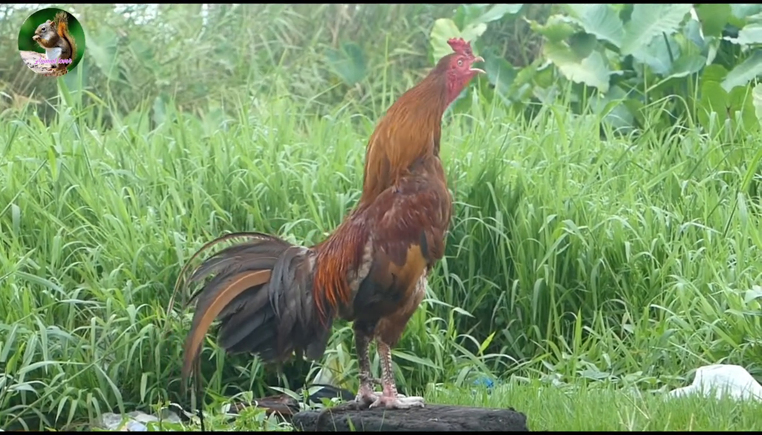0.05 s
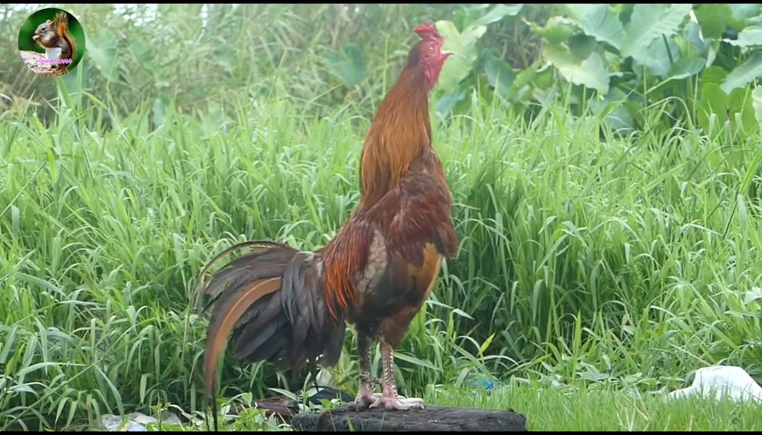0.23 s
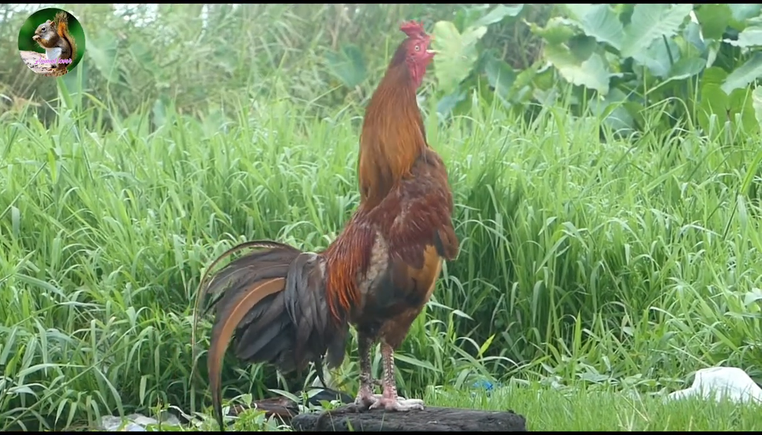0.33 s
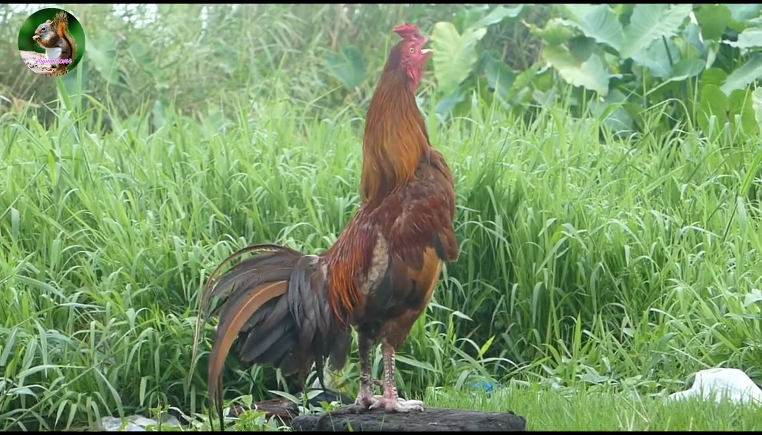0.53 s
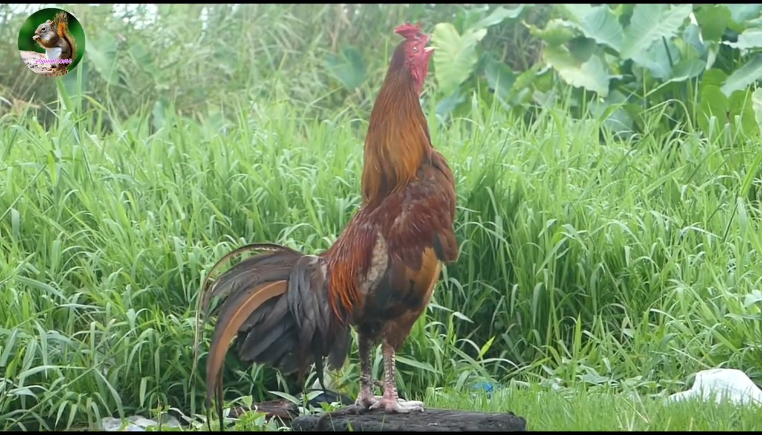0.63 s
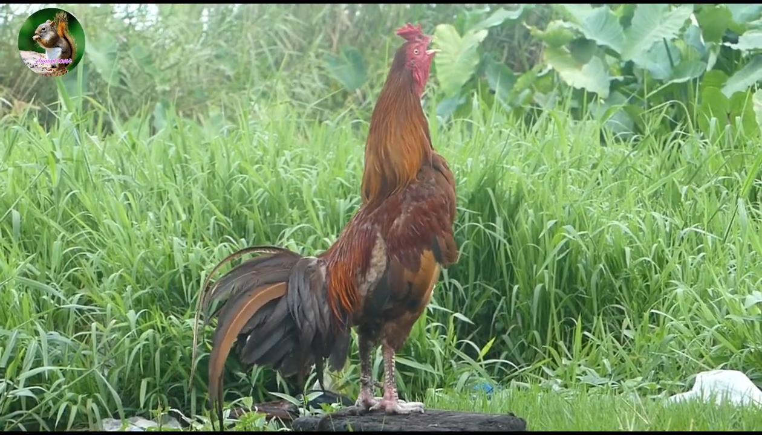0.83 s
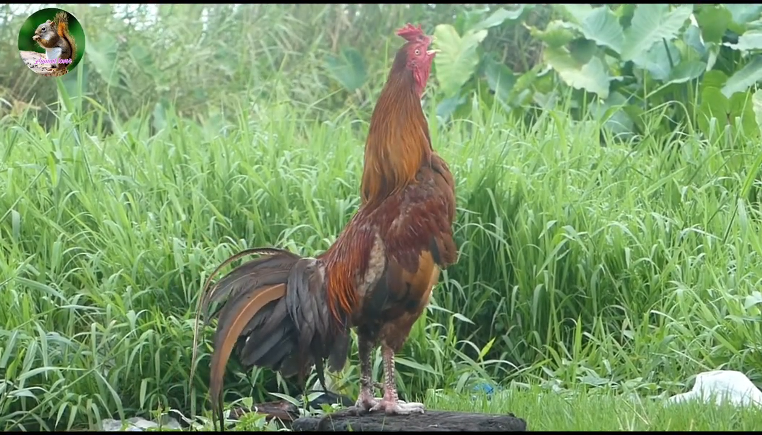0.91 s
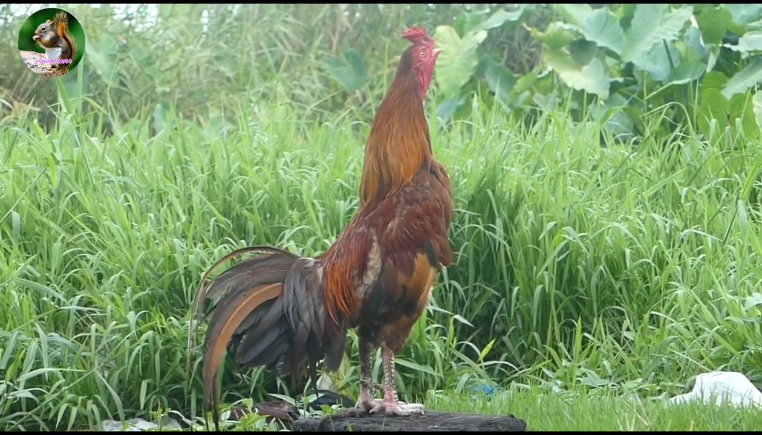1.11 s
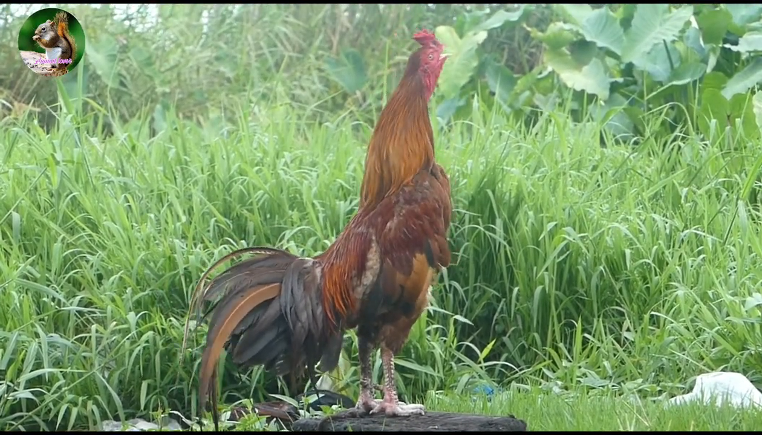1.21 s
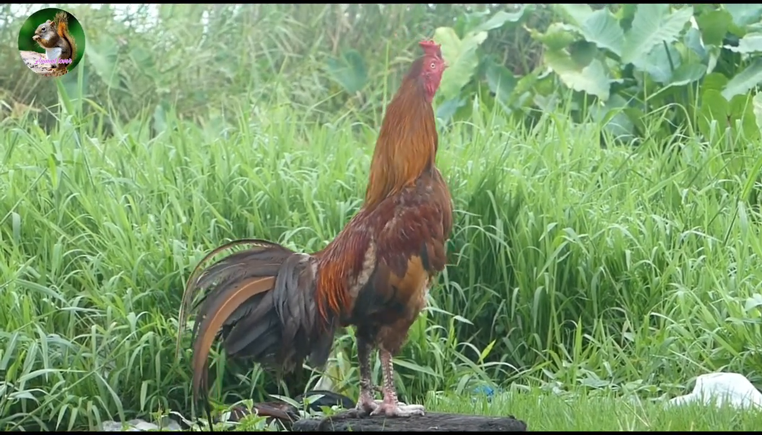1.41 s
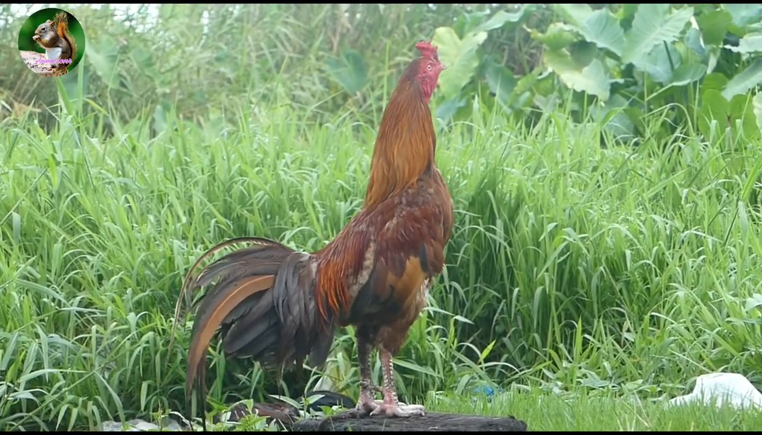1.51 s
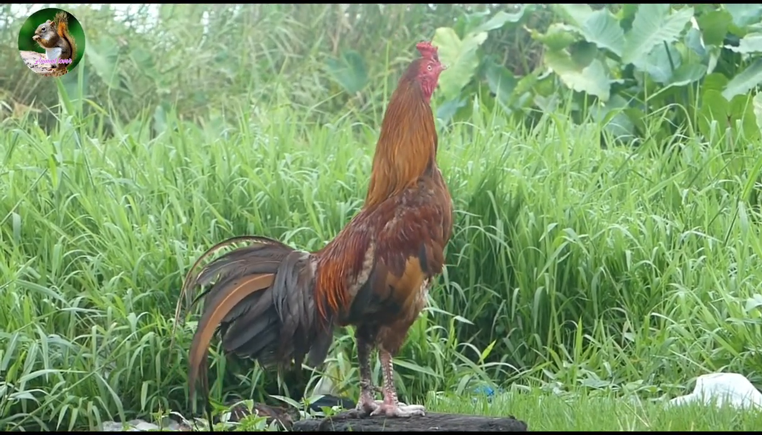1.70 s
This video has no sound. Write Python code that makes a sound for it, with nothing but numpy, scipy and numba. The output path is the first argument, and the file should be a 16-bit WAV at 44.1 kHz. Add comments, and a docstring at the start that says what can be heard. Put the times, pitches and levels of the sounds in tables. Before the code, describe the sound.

A rooster crows once in three hoarse syllables, with faint birds chirping outdoors.

```python
"""A grassy yard: a rooster crows three hoarse syllables, a few metres off and a little to the left.
Its syrinx oscillates unsteadily, giving a wavering fundamental, and ragged pulses with breath noise
that excite the resonances of windpipe and beak. Walls and trees reflect the crow.
Small birds chirp, insects and leaves hiss, and a far engine rumbles."""
import sys
import numpy as np
from scipy import signal
from scipy.fft import rfft, irfft
from scipy.io import wavfile
from numba import njit

SR = 44100
rng = np.random.default_rng(int(sys.argv[2]) if len(sys.argv) > 2 else 0)


def transcribe(signal):
    """Save signal, clipped to [-1, 1], as a 16-bit WAV file at the path in sys.argv[1]."""
    frames = np.atleast_2d(signal).T
    limited = np.clip(frames, -1, 1)
    pcm = np.round(limited * 32767).astype(np.int16)
    wavfile.write(sys.argv[1], SR, pcm)


N = 77175

# The crow, one list per syllable. Each row: time in seconds, fundamental level in dB, pitch in Hz,
# rasp level in dB, treble gain of the rasp in dB, hoarseness and flutter depth (both limited to 0-1).
CROW_SYLLABLES = [
    [(.231, -54, 542.1, -40, 0, 0.82, 0.1), (.236, -28.5, 548.2, -22, -8, 0.78, 0.5),
     (.272, -23.5, 577.7, -15.5, -3, 0.61, 0.5), (.29, -22, 636.9, -16.5, 2, 0.51, 0.87),
     (.322, -25.5, 645.4, -23, 4, 0.69, 0.83), (.345, -24.5, 596.5, -20, 2, 0.66, 1),
     (.37, -52, 617.6, -22.5, -4.5, 0.68, 1), (.398, -66, 573, -38, -10, 1, .5)],
    [(.514, -68, 600, -25.5, -15, 0.75, 0.53), (.528, -26, 639.6, -17, 1, 0.85, 0.1),
     (.546, -21.5, 708, -17, 3, 0.71, 0), (.582, -22, 749, -19, 2.5, 0.73, 0.4),
     (.604, -14, 691.7, -25.5, 12.5, .65, 0), (.63, -41, 677, -18.5, 0, 0.75, 0.05),
     (.638, -46, 513, -23.5, -2, .7, 0.1), (.69, -28, 518, -20.5, 1, 0.75, 0.3),
     (.72, -20.5, 662, -19, 3.5, 0.78, 1.1), (.83, -21, 646.6, -21.5, 3, 0.64, 0.27),
     (.844, -23, 714.2, -21, 1.5, 0.83, 0.9), (.95, -25, 712, -21, 4, .8, 0.82),
     (1.005, -35, 654, -19.5, 1.5, .85, 0.87), (1.05, -34, 592, -24.5, -6, 0.86, 0.56),
     (1.105, -53, 677.8, -31.5, -9, 0.91, 0.71), (1.125, -70, 685.8, -78, 9, 0.81, 0.6)],
    [(1.254, -70, 477.1, -44, -15, .8, 0), (1.266, -44, 503.6, -29, -8, 0.7, 0.3),
     (1.3, -26, 575, -22, -2, .65, 0.3), (1.326, -20, 646.7, -21.5, -2, .5, 0.4),
     (1.344, -22.5, 657.3, -18.5, -3, 0.54, 0.1), (1.368, -21, 662.2, -20.5, 6, 0.56, 0.1),
     (1.4, -15, 633.5, -25, 9, 0.55, 0.34), (1.424, -19, 606.3, -38, 8, 0.58, 0.23),
     (1.444, -21.5, 501, -32.5, -5, 0.63, 0.13), (1.468, -30.5, 429, -44, 12, 0.5, 0.2),
     (1.495, -46, 373, -57, 2, 0.54, 0.65)],
]
# Resonances of windpipe and beak, one list per syllable. Each row: centre in Hz, width in Hz, relative dB.
FORMANTS = [
    [(650, 250, -10.5), (1122, 43, 1.5), (1307, 26, 3.5), (1770, 180, -7.5), (2360, 660, -24.5),
     (2725, 60, -7.5), (4840, 154, -17.5), (5940, 850, -24), (10470, 1070, -26.5)],
    [(647, 137, 7), (1011, 95, 11), (1170, 67, 3), (1279, 58, 5.5), (1488, 74, 6), (1756, 93, 6),
     (2020, 230, -5.5), (2755, 38, 9.5), (3860, 50, 2), (4290, 460, -15), (7876, 400, -14),
     (11430, 560, -21)],
    [(540, 350, 3.5), (1050, 134, 13.5), (1350, 95, 10), (1715, 85, 10), (2250, 96, -5), (2705, 42, 7),
     (3420, 160, -5), (5570, 1100, -14), (12400, 1400, -15.5)],
]
# The neck stretches and sags, one list per syllable. Each row: time in seconds, factor on every formant.
NECK_TUNING = [
    [(.3, 1)],
    [(.54, 1.01), (.7, 1), (.95, .99), (1.1, .978)],
    [(1.27, .955), (1.33, .97), (1.355, 1)],
]
# Dead spots of the windpipe. Each row: centre in Hz, width in Hz.
ANTIRESONANCES = [(852, 148), (3113, 720), (319, 190)]
# Strong and weak cycles of the syrinx, repeated. Each entry: relative level in dB.
CYCLE_ACCENTS_DB = [0, -6, -5, -13]
# Direction of the direct crow. Each row: frequency in Hz, left minus right in dB.
CROW_PAN = [(700, 3.4), (1200, 3.2), (2400, 1), (12000, -2)]
# Echoes from walls and trees. Each row: delay in seconds, left gain in dB, right gain in dB.
REFLECTIONS = [(.012, -6, -19.5), (.045, -11, -10), (.12, -16.5, -20)]
# Small birds. Each row: start and length in seconds, first and last pitch in Hz, mid-note arch in Hz,
# level in dB, warble from 0 to 1.
BIRD_NOTES = [ (0.043, 0.13, 4590, 4250, 63, -48, 0.04), (0.166, 0.041, 4230, 3900, 546, -41.5, 0.35),
              (.472, .055, 2700, 5000, 250, -40, .25), (.49, .045, 2700, 4500, 150, -40, .25),
              (1.464, 0.029, 5386, 5470, 78, -34.5, 0.11), (1.538, 0.0276, 5240, 5840, 62, -37.5, 0.6),
              (1.546, 0.032, 3550, 3940, 237, -32, 0.78), (1.566, 0.018, 4500, 4900, 8, -33.5, 0.97),
              (1.57, 0.0393, 3860, 3700, 0, -38.5, 0.61), (1.59, 0.085, 4030, 4130, -1, -43.5, 0.36),
              (1.698, 0.026, 5380, 5600, 100, -44, 0.6), (1.7, 0.03, 3900, 3980, 16, -41.5, 1), ]
# Spectrum of the yard's hiss. Each row: frequency in Hz, relative spectral density in dB.
HISS_SPECTRUM = [(18, -31), (30, -22), (205, -4.5), (404, -4.5), (680, -9), (815, -5), (1060, -9.5),
                 (2770, -18.5), (3980, -12), (5030, -30.5), (6360, -36), (7060, -35.5), (8920, -14),
                 (15000, -41)]
# Likeness of the hiss in the two channels. Each row: frequency in Hz, correlation.
HISS_CORRELATION = [(30, -0.42), (130, -0.42), (1000, -0.49), (2000, -0.071), (4000, 0.47), (14000, 0.49)]
# Direction of the hiss. Each row: frequency in Hz, left minus right in dB.
HISS_PAN = [(100, -2), (500, 5), (4000, 1.5), (14000, -8)]
# Loudness of the far engine. Each row: time in seconds, relative level in dB.
ENGINE_LEVELS = [(0, -40), (0.3, -46.5), (.75, -51.5), (1.4, -50), (1.75, -43.5)]
# Resonances of the engine's drone. Each row: centre in Hz, width in Hz, relative level in dB.
ENGINE_MODES = [(105.3, 49, -0.5), (143, 40, -5)]

WAVER_HZ, WAVER_RATE_HZ = 16, 30
FLUTTER_HZ, FLUTTER_WANDER_HZ = 64, 10
SHIMMER_SHARE, SHIMMER_RATE_HZ = .85, 45
JITTER_PERIODS, PULSE_CUT_HZ, TREBLE_HZ = .2, 4700, 2430
FORMANT_WANDER_HZ, FORMANT_FLICKER_DB, FORMANT_RATE_HZ = 9, 1.6, 14


def crow_syllable(rows, formants, neck):
    """Source and filter: a modulated fundamental plus a rasp, the syrinx's sound shaped by the throat."""
    t = np.arange(N) / SR
    times, *columns = np.transpose(rows)
    tone_db, hz, rasp_db, treble_db, hoarse, depth = [np.interp(t, times, c) for c in columns]
    hoarse = np.clip(hoarse, 0, 1)
    cycles = np.cumsum(hz + hoarse * WAVER_HZ * drift(WAVER_RATE_HZ)) / SR
    flutter_cycles = np.cumsum(FLUTTER_HZ + FLUTTER_WANDER_HZ * drift(7.6)) / SR
    flutter = 1 + np.clip(depth, 0, 1) * np.sin(2 * np.pi * flutter_cycles)
    tone = syrinx_tone(cycles, flutter, hoarse)
    source = syrinx_pulses(cycles, hz, flutter, hoarse)
    on = (t >= times[0]) & (t <= times[-1])
    rasp = throat(source[on], formants, np.interp(t[on], *np.transpose(neck)))
    rasp = rasp + (amp(treble_db[on]) - 1) * butterworth(rasp, TREBLE_HZ, "high")
    out = np.zeros(N)
    out[on] = amp(tone_db[on]) * tone[on] + amp(rasp_db[on]) * rasp
    return out


def syrinx_tone(cycles, flutter, hoarse):
    """Modulation: flutter gives the fundamental sidebands, and random shimmer broadens its line."""
    share = SHIMMER_SHARE * hoarse
    shimmer = (drift(SHIMMER_RATE_HZ) + 1j * drift(SHIMMER_RATE_HZ)) / np.sqrt(2)
    swing = np.sqrt(1 - share ** 2) * flutter + share * shimmer
    return np.sqrt(2) * np.imag(swing * np.exp(2j * np.pi * cycles))


def syrinx_pulses(cycles, hz, flutter, hoarse):
    """Aperiodic excitation: one pulse a cycle; hoarseness scatters time and strength and adds breath."""
    count = np.floor(cycles).astype(int)
    starts = np.flatnonzero(np.diff(count))
    timing, strength = hoarse[starts] * rng.standard_normal((N, 2))[starts].T
    lag = (np.abs(timing) * JITTER_PERIODS * SR / hz[starts]).astype(int)
    accent_db = np.take(CYCLE_ACCENTS_DB, count[starts], mode="wrap")
    pulses = np.zeros(N)
    pulses[np.minimum(starts + lag, N - 1)] = amp(accent_db + .44 * strength)
    pulses = butterworth(pulses * (2 + flutter), PULSE_CUT_HZ, "low")
    breath = rng.standard_normal(N) * (1 + .5 * np.cos(2 * np.pi * cycles)) * amp(drift(7.3))
    return .63 * np.sqrt(1 - hoarse ** 2) * unit_rms(pulses - pulses.mean()) + hoarse * unit_rms(breath)


def throat(source, formants, tuning):
    """Resonance of windpipe and beak: parallel formants retune together; antiresonances cut notches."""
    out = 0
    for k, (hz, width, db) in enumerate(formants):
        gain = amp(db + FORMANT_FLICKER_DB * drift(FORMANT_RATE_HZ, len(source)))
        centre = hz * tuning + FORMANT_WANDER_HZ * drift(FORMANT_RATE_HZ, len(source))
        out = out + (-1) ** k * gain * moving_resonance(source, centre, width)
    for hz, width in ANTIRESONANCES:
        out = out - resonance(out, hz, width)
    return unit_rms(out)


def yard_echo(x, t60_s=.68, scatter_db=-8, band_hz=(698, 12000)):
    """Reflection from walls and trees: distinct echoes and an exponentially decaying diffuse scatter."""
    t = np.arange(SR) / SR
    scatter = rng.standard_normal((2, SR)) * amp(-60 * t / t60_s) * np.minimum(t / .0085, 1)
    response = amp(scatter_db) * unit_rms(scatter) / np.sqrt(SR)
    for delay, left_db, right_db in REFLECTIONS:
        response[:, int(delay * SR)] += amp([left_db, right_db])
    return signal.fftconvolve(butterworth(x, band_hz, "band")[None], response, axes=1)[:, :N]


def small_birds(warble_hz=450):
    """Frequency modulation: short gliding whistles, some smeared by a fast random warble."""
    t = np.arange(N) / SR
    warble = warble_hz * drift(344)
    out = np.zeros((2, N))
    for start, length, first_hz, last_hz, arch_hz, db, blur in BIRD_NOTES:
        progress = np.clip((t - start) / length, 0, 1)
        arch = np.sin(np.pi * progress)
        hz = first_hz + (last_hz - first_hz) * progress + arch_hz * arch + blur * warble
        note = arch * np.sin(2 * np.pi * np.cumsum(hz) / SR)
        out += amp([[db - 1], [db + 1]]) * note  # slightly to the right
    return out


def yard_hiss(level_db=-39.5, flicker_db=2.5):
    """Partly correlated stereo noise: insects and leaves as half-octave bands that flicker separately."""
    edges = 28 * 2 ** np.arange(0, 9.6, .5)
    white = rng.standard_normal((2, 2, N))
    out = 0
    for k, (low, high) in enumerate(zip(edges, edges[1:])):
        mid, side = butterworth(white[k % 2], [low, high], "band")
        hz = np.sqrt(low * high)
        alike = at_hz(HISS_CORRELATION, hz)
        band = np.sqrt(1 + alike) * mid + np.sqrt(1 - alike) * side * [[1], [-1]]
        out = out + amp(at_hz(HISS_SPECTRUM, hz) + flicker_db * drift(5.3)) * band
    return amp(level_db) * panned(unit_rms(out), HISS_PAN)


def far_engine(side_gain=.21):
    """Narrow-band noise: two low resonances whose random envelopes make a lumpy drone."""
    drone = 0
    for hz, width, db in ENGINE_MODES:
        band = resonance(rng.standard_normal((2, N)), hz, width)
        drone = drone + amp(db) * unit_rms(resonance(band, hz, width))
    mid, side = drone
    level_db = np.interp(np.arange(N) / SR, *np.transpose(ENGINE_LEVELS)) - 3
    return amp(level_db) * (mid + side_gain * side * [[1], [-1]])


def resonance(x, hz, width_hz):
    """Damped resonator: a two-pole band-pass with unit gain at its peak."""
    r = np.exp(-np.pi * width_hz / SR)
    gain = (1 - r * r) / 2
    return signal.lfilter([gain, 0, -gain], [1, -2 * r * np.cos(2 * np.pi * hz / SR), r * r], x)


@njit
def moving_resonance(x, hz, width_hz):
    """Time-varying resonator: a two-pole band-pass whose centre moves from sample to sample."""
    r = np.exp(-np.pi * width_hz / SR)
    y = np.zeros(len(x))
    for i in range(2, len(x)):
        feedback = 2 * r * np.cos(2 * np.pi * hz[i] / SR) * y[i - 1] - r * r * y[i - 2]
        y[i] = (1 - r * r) / 2 * (x[i] - x[i - 2]) + feedback
    return y


def panned(x, balance):
    """Direction by level difference: left and right gains that depend on frequency."""
    db = at_hz(balance, np.maximum(np.fft.rfftfreq(N, 1 / SR), 20))
    return irfft(rfft(x * np.ones((2, 1))) * amp(db * [[.5], [-.5]]), N)


def drift(rate_hz, size=N):
    """Random fluctuation of unit RMS: noise passed twice through a one-pole low-pass."""
    r = np.exp(-2 * np.pi * rate_hz / SR)
    smooth = signal.lfilter([1], [1, -2 * r, r * r], rng.standard_normal(size + SR // 2))
    return unit_rms(smooth[SR // 2:])


def butterworth(x, hz, kind):
    return signal.sosfilt(signal.butter(2, hz, kind, fs=SR, output="sos"), x)


def at_hz(points, hz):
    frequencies, values = np.transpose(points)
    return np.interp(np.log(hz), np.log(frequencies), values)


def amp(db):
    return 10 ** (np.asarray(db) / 20)


def unit_rms(x):
    return x / np.sqrt(np.mean(x ** 2) + 1e-20)


def scene():
    """Superposition: crow and chirps, their reflections, the hiss and the engine add."""
    crow = sum(crow_syllable(*parts) for parts in zip(CROW_SYLLABLES, FORMANTS, NECK_TUNING))
    chirps = small_birds()
    echo = yard_echo(crow + .5 * chirps.mean(axis=0))
    return panned(crow, CROW_PAN) + echo + chirps + yard_hiss() + far_engine()


def record(dry, stop_hz=15500):
    """Band limiting: a steep low-pass removes the highest treble."""
    return signal.sosfilt(signal.cheby2(20, 70, stop_hz, fs=SR, output="sos"), dry)


dry = scene()
out = record(dry)
transcribe(out)
```